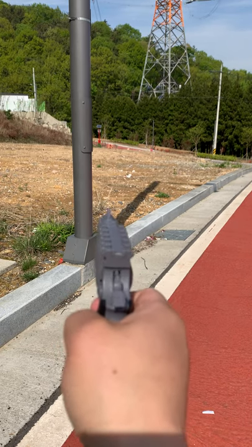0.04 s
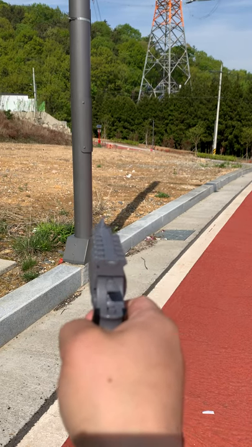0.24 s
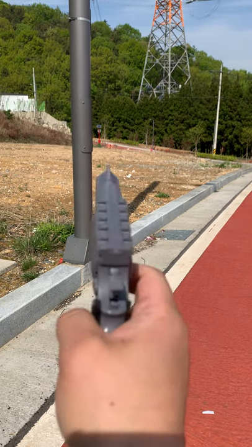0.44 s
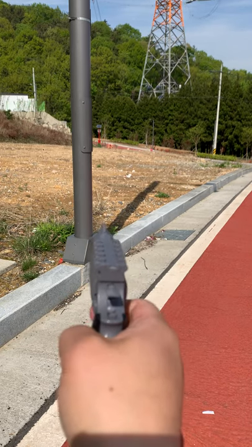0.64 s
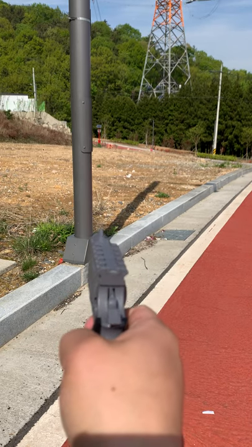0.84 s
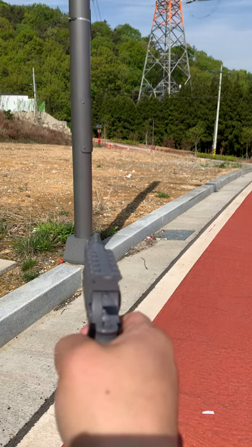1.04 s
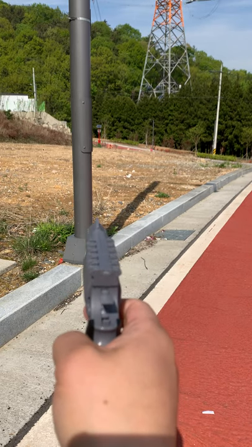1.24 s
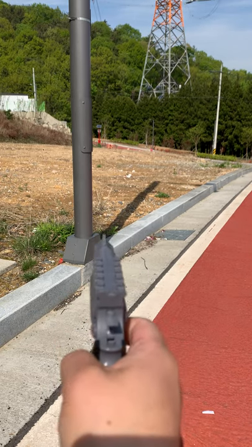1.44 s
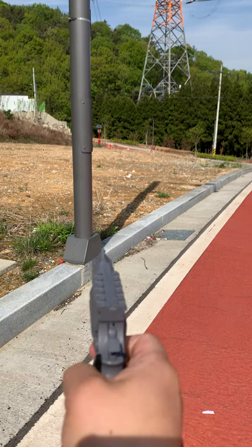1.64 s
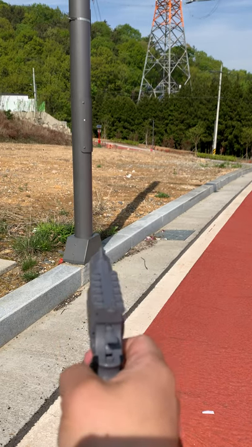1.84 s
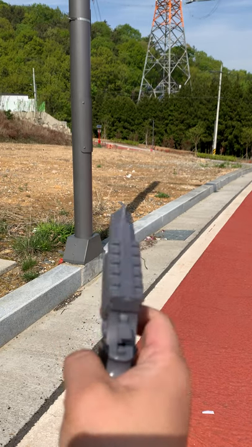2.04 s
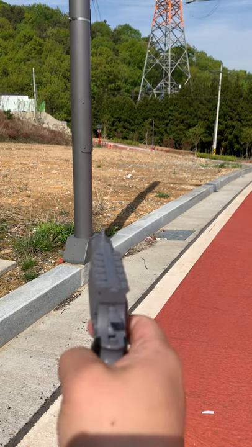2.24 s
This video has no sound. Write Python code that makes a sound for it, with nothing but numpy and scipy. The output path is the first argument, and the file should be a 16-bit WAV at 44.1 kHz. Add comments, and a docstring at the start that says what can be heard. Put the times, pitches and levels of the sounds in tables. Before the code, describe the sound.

A toy airsoft revolver fires three very loud, dry, saturated cracks at about 0.2, 1.05 and 1.87 seconds, the first with a low air thump on the microphone. Lighter trigger and latch clacks follow near 0.43, 1.3 and 2.1. Between them come tiny plastic ticks, soft knocks, hand rubs and a thin squeak around 0.5. Wind rumble swells at 0.3-0.7 and 1.7 over faint open-air hiss and distant drone.

```python
"""Three loud, overloaded plastic-and-metal cracks: a toy airsoft revolver fired outdoors at arm's length.
Each hammer fall is coloured noise plus ringing frame modes, with one rebound; clacks follow about 0.2 s later.
Between shots: ticks and soft knocks, grip rubs made of stick-slip grains, and squeaks of narrow-band noise.
Behind: gusts of low noise, one puff on the microphone, a faint distant drone and open-air hiss.
The microphone saturates and the recorder cuts the top."""
import sys
import numpy as np
from scipy import signal
from scipy.fft import rfft, irfft, next_fast_len
from scipy.io import wavfile

SR = 44100
rng = np.random.default_rng(int(sys.argv[2]) if len(sys.argv) > 2 else 0)


def transcribe(u):
    """Save the signal u as a 16-bit wav file named by the first command-line argument.

    u: samples, shape (n,) or (channels, n), limited to [-1, 1]; the rate is SR.
    q: integer samples, one column per channel.
    """
    v = np.clip(np.atleast_2d(u).T, -1, 1)
    q = np.round(v * 32767).astype(np.int16)
    wavfile.write(sys.argv[1], SR, q)


N = 101430
HIT_S = 0.15  # length of every contact sound

# Crack spectrum: (frequency [Hz], density [dB per Hz])
CRACK_SPECTRUM = [(60, -17), (200, -6.5), (420, -18.5), (650, -6), (1000, -21.5), (1600, -5), (2600, -1),
                  (4000, -3), (6200, -4.5), (9000, -10), (13000, -12), (16000, -13)]
# Shots: (time [s], level [dB], rebound delay [s], rebound level [dB re blow], thump level [dB re blow],
# thump pitch [Hz], treble tilt [dB/octave])
SHOTS_FIRED = [(0.2139, 1.5, .0069, -7.5, -7, 350, 1), (1.0621, -0.5, .009, -8.5, -11.5, 257, -0.5),
               (1.8707, 0, .0088, -8.5, -12, 288, 0.5)]
CRACK_T60_S, CRACK_HOLD_S, RING_DB = 0.042, 0.0031, -4
SEAR_LEAD_S, SEAR_DB_RE_BLOW = 0.0026, -30.5
THUMP_WIDTH_HZ, THUMP_T60_S = 250, 0.044
HUM_HZ, HUM_WIDTH_HZ, HUM_T60_S, HUM_DB_RE_BLOW = 1637, 260, 0.33, -35


def shots():
    """The sear slips, the hammer lands with a low thump and hollow frame hum, then rebounds once."""
    out = np.zeros(N)
    for at, db, rebound_s, rebound_db, thump_db, thump_hz, tilt in SHOTS_FIRED:
        sear = hit(CRACK_SPECTRUM, CRACK_T60_S, RING_DB, tilt_db=-3)
        add(out, at - SEAR_LEAD_S, undb(db + SEAR_DB_RE_BLOW) * sear)

        crack = hit(CRACK_SPECTRUM, CRACK_T60_S, RING_DB, tilt, CRACK_HOLD_S)
        thump = undb(thump_db) * band(HIT_S, thump_hz, THUMP_WIDTH_HZ) * fade(THUMP_T60_S)
        hum = undb(HUM_DB_RE_BLOW) * band(HIT_S, HUM_HZ, HUM_WIDTH_HZ) * fade(HUM_T60_S)
        add(out, at, undb(db) * (crack + thump + hum))

        rebound = hit(CRACK_SPECTRUM, CRACK_T60_S / 2, RING_DB, tilt_db=-1)
        add(out, at + rebound_s, undb(db + rebound_db) * rebound)
    return out


def hit(spectrum, t60_s, ring_db, tilt_db=0, hold_s=0):
    """One contact: a decaying crack of coloured noise plus the ring of the frame."""
    crack = colour(noise(HIT_S), spectrum, tilt_db) * fade(t60_s, hold_s)
    return crack + undb(ring_db) * ring()


# Modes of the plastic frame and its metal parts: (frequency [Hz], level [dB], T60 [s])
FRAME_MODES = [(664, -10.5, 0.035), (810, -14, 0.031), (1067, -14, 0.039), (1361, -6.5, 0.047),
               (1634, -13.5, 0.085), (1868, -3.5, 0.047), (2073, -11.5, .035), (2404, -1, 0.038),
               (2574, -0.5, 0.046), (2813, -2.5, 0.046), (3300, -4.5, 0.058), (3425, -8.5, 0.058),
               (4030, -4, 0.054), (4910, -20, 0.023), (5216, -5, 0.06), (6004, -0.5, 0.043),
               (6090, -11, 0.077), (8690, -4.5, 0.05)]


def ring():
    """Frame modes as decaying sines, with random phase and slight detuning at every blow."""
    age = clock(HIT_S).astype(np.float32)
    hz, db, t60_s = np.array(FRAME_MODES, np.float32).T[:, :, None]
    detune, phase = rng.standard_normal((2, len(FRAME_MODES), 1)).astype(np.float32)
    sines = np.sin(2 * np.pi * (hz * (1 + 0.0041 * detune) * age + phase))
    decay = np.exp(-float(np.log(1000)) * age / t60_s)
    modes_rms = np.sqrt(np.sum(undb(db) ** 2) / 2)
    return (undb(db) * sines * decay).sum(0) / modes_rms


# Clack and tick spectrum: (frequency [Hz], density [dB per Hz])
CLACK_SPECTRUM = [(100, -24), (480, -45), (780, -13), (1200, -9), (1900, 0), (3000, 0), (4500, -4),
                  (7000, -6.5), (11000, -10), (16000, -12)]
# Trigger and cylinder latch: (time [s], level [dB], T60 [s])
ACTION_CLACKS = [(0.419, -26, .05), (.431, -19, 0.013), (0.4336, -15, 0.034), (0.4387, -14.5, 0.035),
                 (1.3003, -26, 0.021), (1.3055, -17, 0.017), (1.3094, -14, 0.036), (2.0938, -23.5, 0.021),
                 (2.0975, -17.5, 0.036), (2.105, -14.5, 0.026)]
CLACK_RING_DB = -10.5


def action():
    """The trigger returns and the latch drops: a quick run of contacts that ring the frame."""
    out = np.zeros(N)
    for at, db, t60_s in ACTION_CLACKS:
        add(out, at, undb(db) * hit(CLACK_SPECTRUM, t60_s, CLACK_RING_DB))
    return out


# Ticks of grip and action: (time [s], level [dB], treble tilt [dB/octave])
SMALL_TICKS = [(.002, -30, -3), (0.1325, -38, 2), (0.162, -31, 0.5), (0.181, -32.5, 1), (.278, -31, 3),
               (.346, -29, -7), (.394, -33.5, -7), (0.4048, -27, 0.5), (.762, -25.5, 3.5),
               (.7825, -32.5, 1), (0.833, -32.5, -0.5), (0.881, -32.5, -7), (.936, -34.5, -1.5),
               (0.972, -40, -2.5), (1.088, -23, 5), (1.1135, -26, 6), (1.119, -25, 14), (1.128, -32, 5),
               (1.258, -34, 1), (1.2693, -28, 3), (1.2845, -23, -5), (1.4709, -29, 6), (1.576, -40, -5),
               (1.601, -40, -13), (1.652, -37, -2.5), (1.687, -41, -1), (1.7673, -32, -2.5),
               (1.812, -36.5, -1), (1.93, -33.5, 3), (1.9455, -29, 4.5), (1.958, -31, 1),
               (1.9918, -21.5, 6.5), (2.056, -27.5, 0.5), (2.066, -27, 2), (2.080, -30, -11),
               (2.1446, -27, 7), (2.177, -33, 16), (2.197, -22.5, 3), (2.229, -29, 9), (2.275, -23, 4)]
TICK_T60_S, TICK_RING_DB = 0.017, -13.5


def ticks():
    """Light plastic contacts, tilted dull or bright, in the clack spectrum."""
    out = np.zeros(N)
    for at, db, tilt in SMALL_TICKS:
        add(out, at, undb(db) * hit(CLACK_SPECTRUM, TICK_T60_S, TICK_RING_DB, tilt))
    return out


# Rubbing-skin spectrum: (frequency [Hz], density [dB per Hz])
RUB_SPECTRUM = [(200, -20), (550, -21), (800, -12.5), (1150, -15.5), (1620, -2.5), (2000, -4), (2400, -3.5),
                (3500, -1), (5500, -3.5), (7500, -8), (8800, -6), (13500, -9), (16000, -16)]
# Resonances under the hand: (frequency [Hz], width [Hz], level [dB])
GRIP_MODES = [(1640, 170, -7), (4560, 200, 0), (5480, 93, -10), (6200, 670, 1), (8680, 960, -7.5)]
GRIP_DB = -6.5
SLIPS_PER_S, SLIP_SPREAD_DB, SLIP_T60_S = 330, 4.5, 0.017
SMOOTH_SHARE = 0.4  # steady noise under the grains, amplitude


def rubbing():
    """Skin sticks and slips: uneven decaying noise grains excite the grip resonances."""
    slip_count = 2000
    gap, size = rng.random(slip_count), rng.standard_normal(slip_count)
    where = (np.cumsum(0.25 + 1.5 * gap) * SR / SLIPS_PER_S).astype(int)
    slip_power = undb(SLIP_SPREAD_DB * np.clip(size, -2, 1.7)) ** 2
    slips = np.bincount(where, slip_power, N)[:N]
    power_keep = np.exp(-2 * np.log(1000) / (SLIP_T60_S * SR))
    power = signal.lfilter([1], [1, -power_keep], slips)
    grains = noise() * np.sqrt(power / power.mean() + SMOOTH_SHARE ** 2)
    body = unit(sum(undb(db) * resonate(grains, hz, width) for hz, width, db in GRIP_MODES))
    return colour(grains, RUB_SPECTRUM) + undb(GRIP_DB) * body


# Hand rubs: (time [s], attack [s], hold [s], time to fall 20 dB [s], level [dB], treble tilt [dB/octave])
HAND_RUBS = [(0.0, 0.0042, 0.019, 0.03, -36.5, -2.5), (0.02, 0.0136, 0.046, 0.2, -50.5, -1),
             (0.162, .01, 0.028, 0.15, -44.5, -5.5), (0.217, 0.0045, 0.0074, 0.19, -28, 1.5),
             (0.407, 0.022, 0.032, 0.04, -39.5, -1), (.492, 0.01, 0.071, 0.2276, -27.5, 1.5),
             (0.713, 0.1, .12, 0.11, -50.5, -6.5), (1.077, 0.011, 0.05, .1, -33.5, 1),
             (1.172, 0.038, .13, 0.04, -42.5, -3.5), (1.373, 0.058, 0.064, .16, -42, -0.3),
             (1.565, 0.05, .13, 0.3, -58, -6.5), (1.761, 0.0144, 0.019, 0.4, -50.5, -3.5),
             (1.888, .006, 0.016, .13, -29.5, 1.5), (1.986, 0.0038, .008, 0.12, -33, 4),
             (2.056, 0.024, 0.044, 0.1, -38, -3.5), (2.134, 0.043, 0.048, 0.2, -29.5, 3)]


def hand():
    """Each rub is a stretch of stick-slip friction under its own pressure envelope and tilt."""
    rub = rubbing()
    flat = [(1, 0), (SR, 0)]
    out = np.zeros(N)
    for at, attack, hold, fall, db, tilt in HAND_RUBS:
        age = clock(attack + hold + 2 * fall)
        fall_db = 20 * np.maximum(age - attack - hold, 0) / fall
        press = np.minimum(age / attack, 1) * undb(db - fall_db)
        stretch = rub.take(int(at * SR) + np.arange(len(age)), mode="wrap")
        add(out, at, press * colour(stretch, flat, tilt))
    return out


# Skin-on-plastic squeaks: (time [s], length [s], pitch [Hz], level [dB])
SKIN_SQUEAKS = [(0.49, 0.074, 5470, -29.5), (0.547, 0.087, 4680, -36), (1.109, 0.024, 6120, -35),
                (1.341, 0.15, 2280, -51), (2.164, .07, 5380, -35.5)]
SQUEAK_WIDTH_HZ = 380  # each of two filter passes


def squeaks():
    """Thin squeaks: narrow-band noise under a half-sine swell."""
    out = np.zeros(N)
    for at, length, hz, db in SKIN_SQUEAKS:
        swell = np.sin(np.pi * clock(length) / length)
        add(out, at, undb(db) * band(length, hz, SQUEAK_WIDTH_HZ) * swell)
    return out


# Trigger-finger knocks: (time [s], level [dB])
FINGER_KNOCKS = [(.005, -41), (0.159, -37.5), (.394, -44), (.406, -38), (1.2575, -42.5), (1.2687, -45),
                 (1.7665, -41), (2.08, -39)]
KNOCK_HZ, KNOCK_WIDTH_HZ, KNOCK_T60_S = 855, 410, 0.069


def knocks():
    """Soft knocks: decaying noise in one resonance."""
    out = np.zeros(N)
    for at, db in FINGER_KNOCKS:
        add(out, at, undb(db) * band(HIT_S, KNOCK_HZ, KNOCK_WIDTH_HZ) * fade(KNOCK_T60_S))
    return out


# Wind strength at the microphone: (time [s], level [dB])
WIND_STRENGTH = [(0, -30), (.12, -32.5), (.3, -22.5), (.4, -19), (.52, -20), (.65, -17), (.75, -29),
                 (1.0, -31.5), (1.15, -28), (1.45, -28.5), (1.6, -35.5), (1.72, -21.5), (1.85, -29),
                 (2.02, -35), (2.17, -33.5), (2.28, -25)]
# Rumble spectrum: (frequency [Hz], density [dB per Hz])
WIND_SPECTRUM = [(3, -4), (8, 1.5), (18, -3.5), (28, -9), (45, -14.5), (70, -21), (120, -35), (300, -55),
                 (1000, -85)]


def wind():
    """Gusts buffet the microphone: low coloured noise follows the strength curve."""
    strength_db = np.interp(clock(), *np.array(WIND_STRENGTH).T)
    return undb(strength_db) * colour(noise(), WIND_SPECTRUM)


PUFF_S, PUFF_RISE_S, PUFF_DECAY_S = 0.2165, 0.0044, 0.039  # start, rise and decay constants
PUFF_HZ, PUFF_SCALE_DB = 6.25, 0.5


def puff():
    """Air from the first shot pushes the diaphragm far out; it swings back as a damped cosine."""
    age = np.maximum(clock() - PUFF_S, 0)
    rise = 1 - np.exp(-(age / PUFF_RISE_S) ** 2)
    swing = np.exp(-age / PUFF_DECAY_S) * np.cos(2 * np.pi * PUFF_HZ * age)
    return undb(PUFF_SCALE_DB) * rise * swing


DRONE_HZ, DRONE_WIDTH_HZ, DRONE_DB = 74.3, 20.7, -41


def drone():
    """Low distant drone: steady noise in a narrow band."""
    return undb(DRONE_DB) * band(None, DRONE_HZ, DRONE_WIDTH_HZ)


# Open-air spectrum: (frequency [Hz], density [dB per Hz])
AIR_SPECTRUM = [(40, -4), (90, 0.5), (160, -4), (270, -4.5), (430, -15), (850, -15), (1300, -23.5),
                (2100, -31.5), (4000, -25), (6000, -45), (9000, -56), (16000, -66)]
AIR_DB = -47.5


def open_air():
    """Soft open-air background: steady coloured noise."""
    return undb(AIR_DB) * colour(noise(), AIR_SPECTRUM)


def undb(db):
    """Decibels to gain."""
    return 10 ** (np.asarray(db) / 20)


def unit(x):
    """Scale to rms 1."""
    return x / np.sqrt(np.mean(x ** 2) + 1e-20)


def clock(length_s=None):
    """Sample times [s] of a short sound, or of the whole scene."""
    return np.arange(N if length_s is None else int(length_s * SR)) / SR


def noise(length_s=None):
    """White noise."""
    return rng.standard_normal(len(clock(length_s)))


def fade(t60_s, hold_s=0):
    """Sudden start, hold, exponential decay; HIT_S long."""
    return np.exp(-np.log(1000) * np.maximum(clock(HIT_S) - hold_s, 0) / t60_s)


def colour(x, points, tilt_db=0):
    """Shape by (Hz, dB) points on a log axis, plus a tilt per octave about 4 kHz; rms 1."""
    size = next_fast_len(len(x), True)
    hz = np.maximum(np.arange(size // 2 + 1) * SR / size, 1)
    point_hz, point_db = np.array(points).T
    db = np.interp(np.log(hz), np.log(point_hz), point_db)
    db = db + tilt_db * np.log2(np.maximum(hz, 700) / 4000)  # tilt stops below 700 Hz
    return unit(irfft(rfft(x, size) * undb(db), size)[:len(x)])


def resonate(x, hz, width_hz):
    """One resonance, gain 1 at its centre."""
    return signal.lfilter(*signal.iirpeak(hz, hz / width_hz, fs=SR), x)


def band(length_s, hz, width_hz):
    """Noise passed twice through one resonance; rms 1."""
    once = resonate(noise(length_s), hz, width_hz)
    return unit(resonate(once, hz, width_hz))


def add(out, start_s, sound):
    """Mix a sound in at its time, cut at the scene's end."""
    first = max(int(start_s * SR), 0)
    out[first:first + len(sound)] += sound[:max(N - first, 0)]


def scene():
    """Revolver, hand and weather at one microphone."""
    revolver = shots() + action() + ticks()
    grip = hand() + squeaks() + knocks()
    weather = wind() + puff() + drone() + open_air()
    return (revolver + grip + weather)[None]


CEILING, KNEE = 0.59, 4.7  # saturation amplitude, knee exponent
TOP_HZ = 15900


def record(dry):
    """The microphone saturates smoothly at its ceiling; the recorder low-passes the result."""
    clipped = dry / (1 + np.abs(dry / CEILING) ** KNEE) ** (1 / KNEE)
    low_pass = signal.firwin(151, TOP_HZ, fs=SR)
    return signal.fftconvolve(clipped, low_pass[None], "same")


dry = scene()
out = record(dry)
transcribe(out)
```